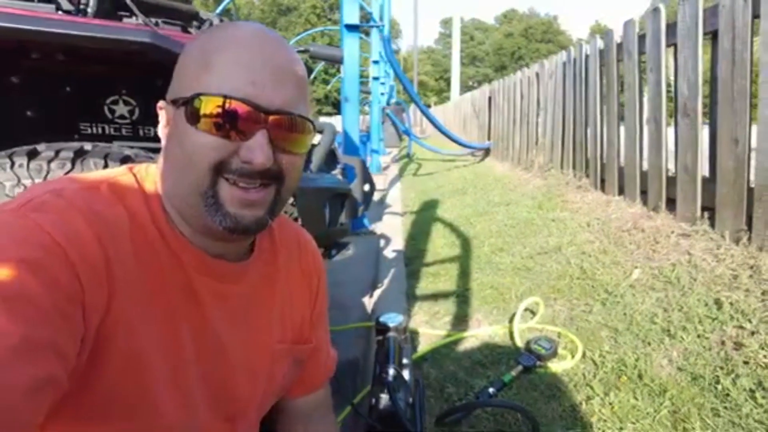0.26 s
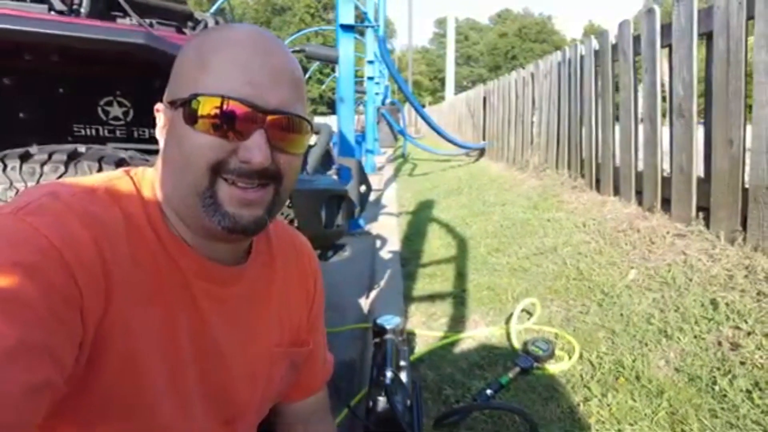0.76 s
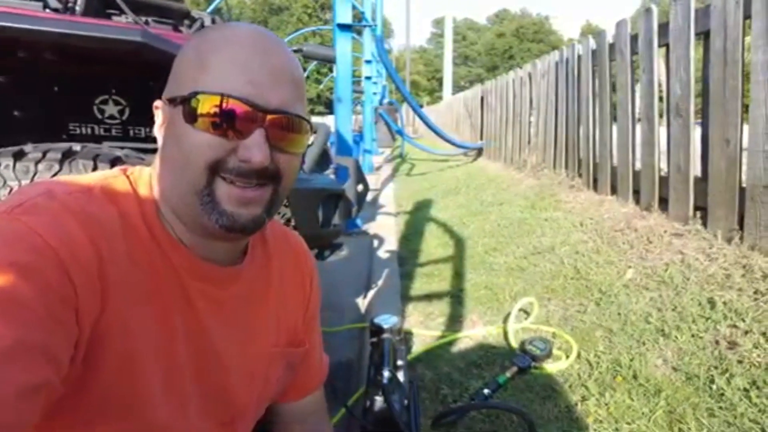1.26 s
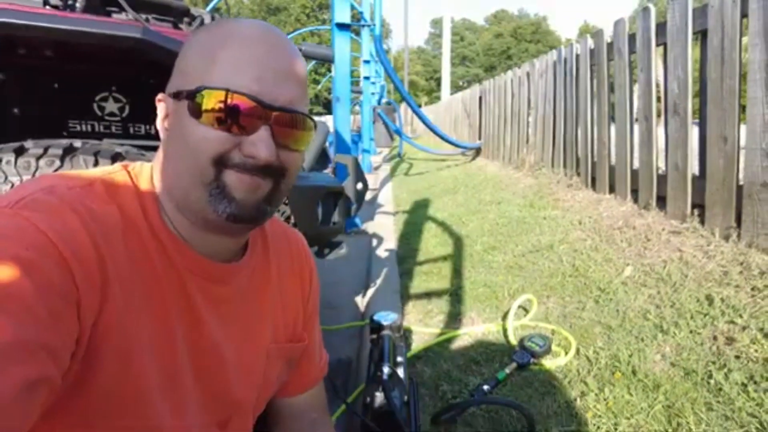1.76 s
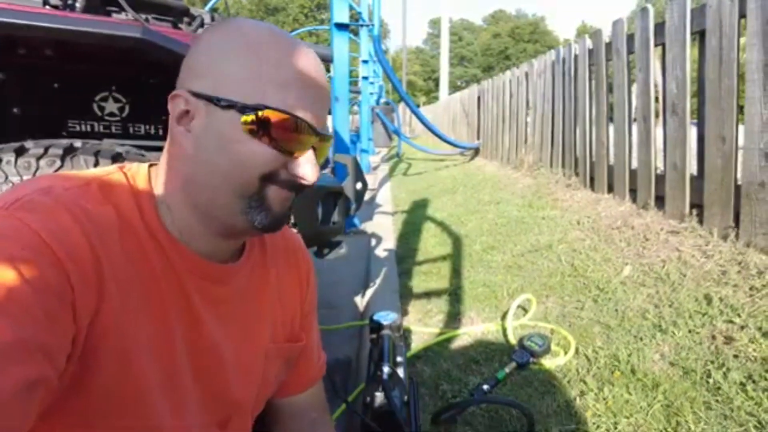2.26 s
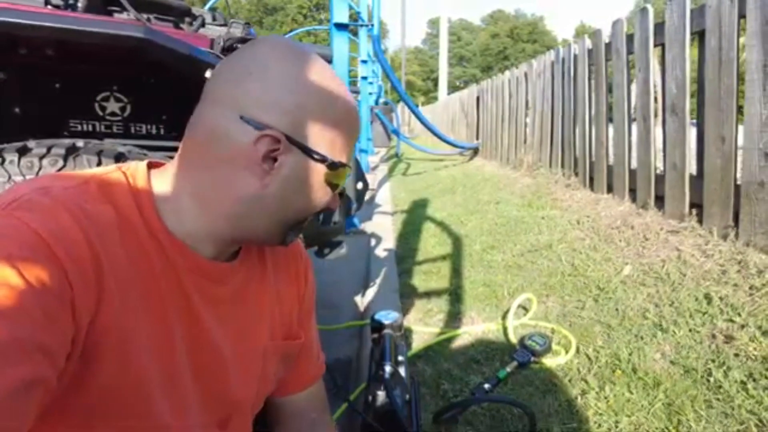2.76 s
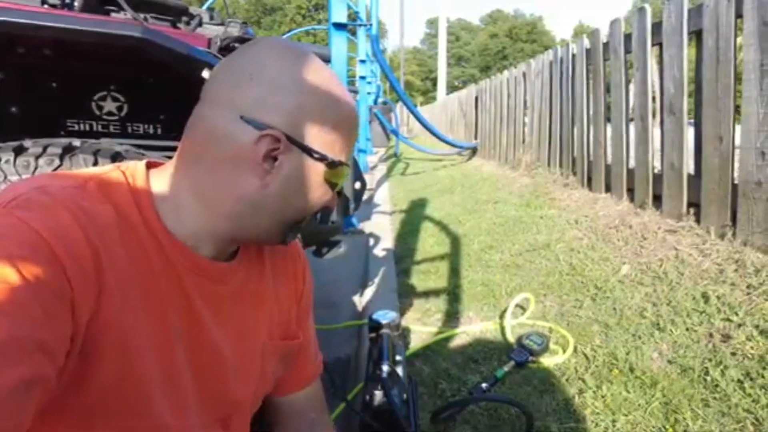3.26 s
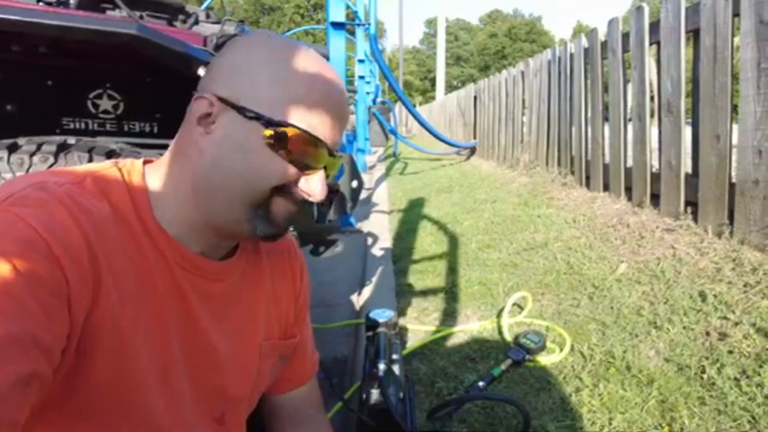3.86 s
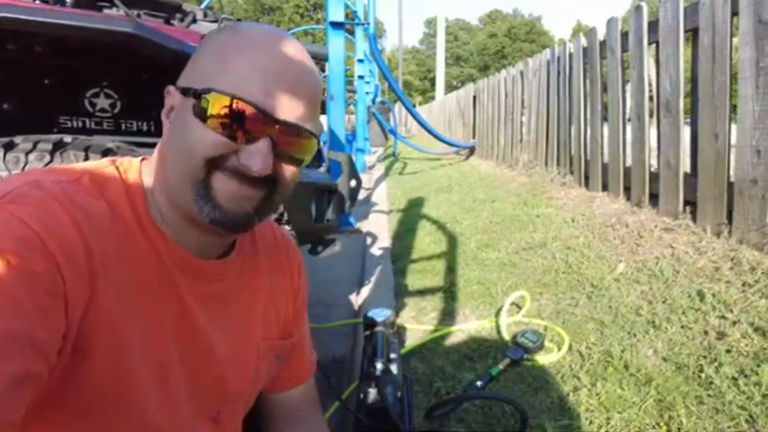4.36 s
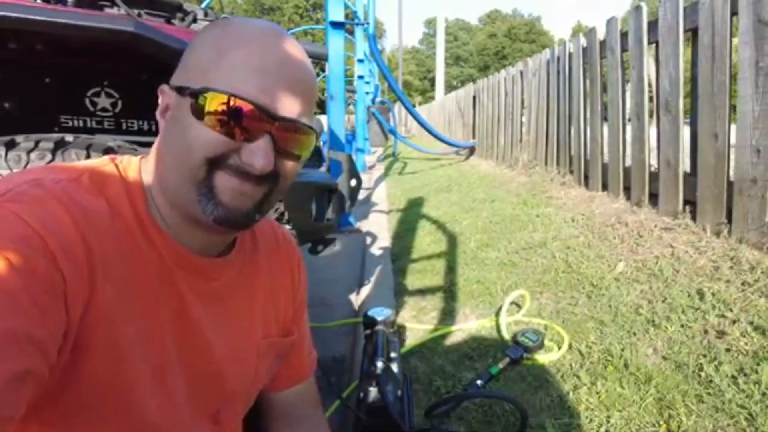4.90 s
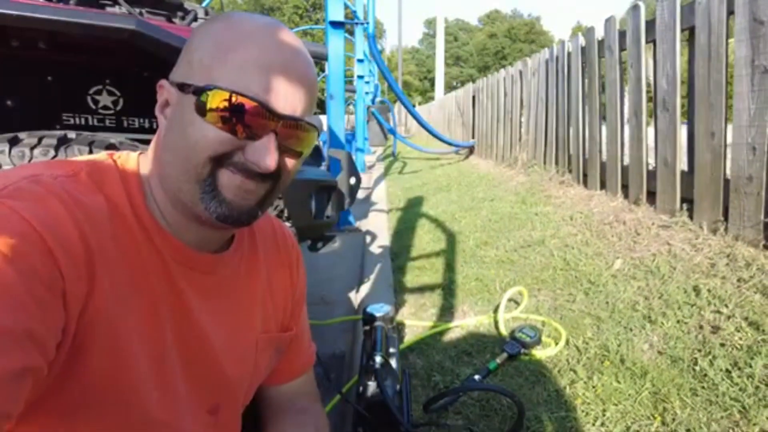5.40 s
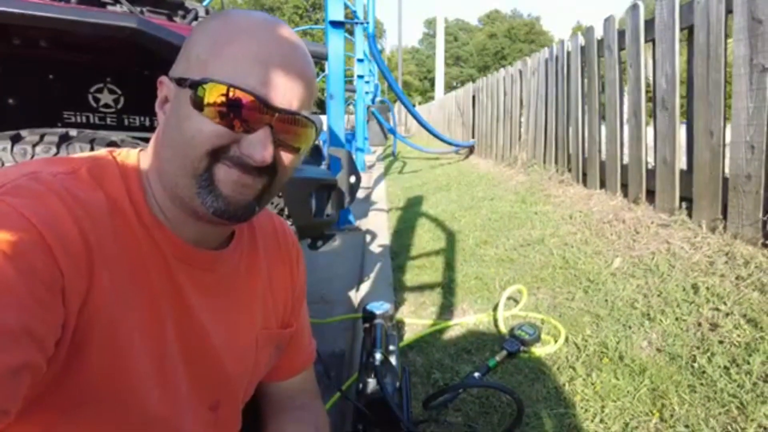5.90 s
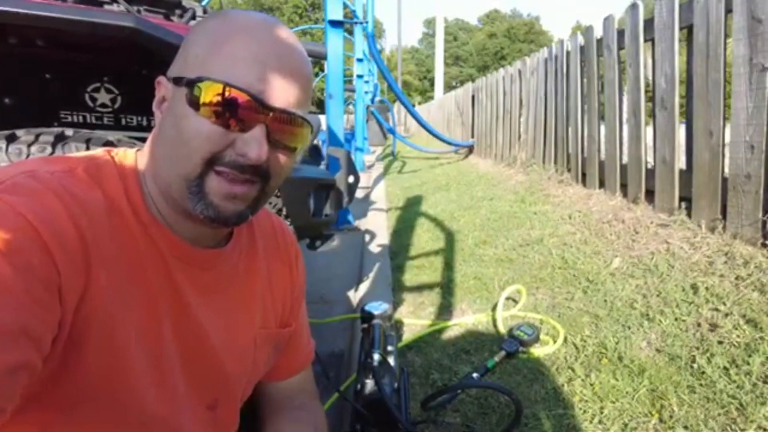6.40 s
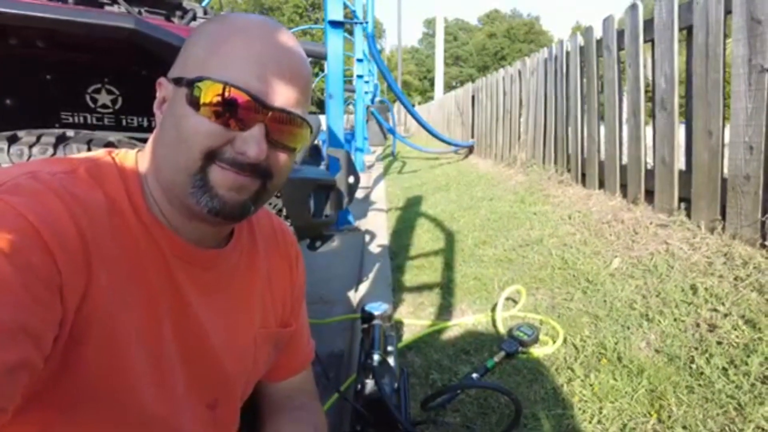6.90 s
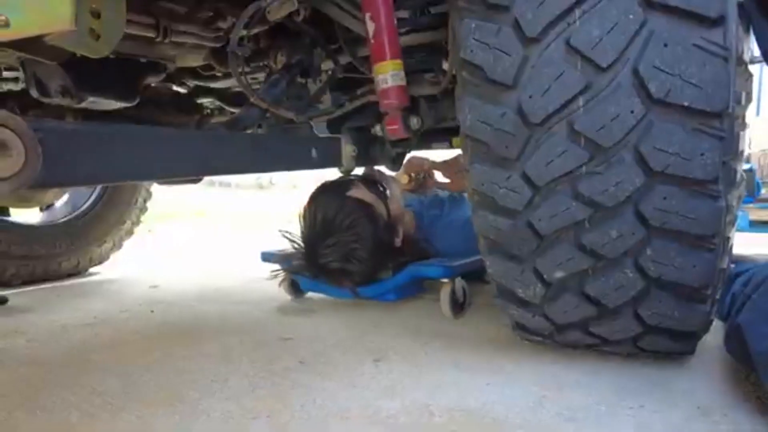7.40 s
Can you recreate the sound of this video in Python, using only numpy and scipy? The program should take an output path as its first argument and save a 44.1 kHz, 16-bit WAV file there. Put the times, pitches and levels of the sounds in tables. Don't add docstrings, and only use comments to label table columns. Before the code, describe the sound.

Outdoors on grass, a small piston compressor runs continuously, a loud coarse buzz with deep pulsing thud and a steady fan tone. A faraway car rolls by, then another pulls away with rising pitch, both mostly buried. A hard scene change ends the noise; quiet low rumble and faint hiss remain, with short dry steel clinks and a scrape close by. Wide handheld stereo pickup, dull and slightly gritty on top.

```python
import sys
import numpy as np
from scipy import signal
from scipy.fft import rfft, irfft, next_fast_len
from scipy.io import wavfile
from scipy.ndimage import uniform_filter1d

SR = 44100
rng = np.random.default_rng(int(sys.argv[2]) if len(sys.argv) > 2 else 0)


def level_to_linear(level):
    exponent = np.asarray(level, float) / 20
    return 10 ** exponent


def store_pcm(level_fs):
    pcm = np.round(np.clip(level_fs, -1, 1) * 32767).astype(np.int16)
    wavfile.write(sys.argv[1], SR, np.atleast_2d(pcm).T)


N = 337359
T = np.arange(N) / SR
PAD = next_fast_len(N + 4096)
F = np.maximum(np.fft.rfftfreq(PAD, 1 / SR), 1)
CUT_S = 7.087

# time_s, crank_hz
CRANK_SPEED = [(0, 49.37), (.9, 49.37), (1.15, 49.07), (2.3, 49.07), (2.7, 49.38), (7.1, 49.4)]
# pitch_hz, place_turns, length_turns, air_boost (ratio)
VALVE_EVENTS = [(600, .74, .1, .4), (1400, .54, .035, .6), (2800, .87, .04, .45), (5600, .86, .05, .8),
                (11000, .86, .05, .25)]


def curve(table, column=1):
    return np.interp(T, [row[0] for row in table], [row[column] for row in table])


def over_hz(table):
    return np.interp(np.log(F), np.log([max(row[0], 1) for row in table]), [row[1] for row in table])


def bumps(table, width_s):
    return sum(db * np.exp(-.5 * ((T - s) / width_s) ** 2) for s, db in table)


def walk(rate):
    k = int(SR / rate)
    held = np.repeat(rng.standard_normal(N // k + 1), k)
    return 1.28 * uniform_filter1d(uniform_filter1d(held, k), k)[:N]


def noise(gain):
    white = rng.standard_normal((2, PAD))
    return irfft(rfft(white) * gain * np.sqrt(SR / 2), PAD)[:, :N]


def unit(x):
    return x / np.sqrt(np.mean(x[0] ** 2))


def tone(turns, db, wobble_db, rate):
    mid_phase = 2 * np.pi * (turns + 0.027 * wobble_db * walk(rate))
    mid = np.sin(mid_phase) * level_to_linear(wobble_db * walk(rate))
    side = 0.4 * np.cos(2 * np.pi * (turns + 0.078 * wobble_db * walk(rate)))
    return np.sqrt(2) * level_to_linear(db) * np.array([mid, side])


def piston(turns):
    stroke_db = [-23, -56, -31, -35, -32.5, -42, -36, -69, -42, -38.5, -38, -47, -42, -40, -74, -41, -64,
                 -40.5, -53, -50, -42, -69, -71, -44, -41, -52.5, -49, -51.5, -79, -45, -47, -85, -52, -62,
                 -50.5, -72, -52, -59, -56, -61]
    # crank_multiple, level_db (rms)
    whine_lines = [(48, -73), (52, -60), (58, -57), (62, -55.5)]
    # time_s, level_db
    thud_swell = [(0, -18), (.7, -22.5), (1.15, -21.5), (1.6, -23), (2.3, -23.5), (2.7, -20.5), (3.15, -24),
                  (3.4, -23.5), (4.0, -21), (4.3, -18.5), (4.55, -20), (5.1, -24), (5.8, -22), (7.1, -22)]
    # time_s, depth_db
    thud_dips = [(.99, 10), (1.32, 2), (1.83, 9), (1.99, 6), (2.46, 11), (3.26, 8), (3.43, 9), (4.65, 15),
                 (5.5, 4), (5.88, -1), (6.5, 8)]
    orders = np.arange(1, len(stroke_db) + 1)
    places = np.interp(orders * CRANK_SPEED[0][1], [v[0] for v in VALVE_EVENTS], [v[1] for v in VALVE_EVENTS])
    lag = np.cumsum(places) + 0.14 * rng.standard_normal(len(orders))
    thud_db = curve(thud_swell) - bumps(thud_dips, width_s=0.02)
    out = tone(turns - .3, thud_db, wobble_db=1.6, rate=14)
    for k, delay, db in zip(orders[1:], lag[1:], stroke_db[1:]):
        out = out + tone(k * turns - delay, db, wobble_db=min(0.2 * k + 0.1, 4.2), rate=22)
    for k, db in whine_lines:
        out = out + tone(k * turns, db, wobble_db=1.5, rate=13)
    return out


def fan():
    fan_hz, shake_hz, shake_db = 39.07, 33.3, -35
    # shaft_multiple, level_db (rms)
    shaft_lines = [(2, -45), (7, -44), (9, -25), (11, -47), (13, -48), (14, -42), (16, -34.6), (18, -36),
                   (20, -48), (22, -53), (23, -43), (30, -52), (31, -51)]
    turns = np.cumsum(fan_hz * (1 + 0.0003613 * walk(1))) / SR
    blades = 0
    for k, db in shaft_lines:
        blades = blades + tone(k * turns + rng.random(), db, wobble_db=0.3 + 0.27 * max(k - 9, 0), rate=16)
    return blades + tone(shake_hz * T, shake_db, wobble_db=4.5, rate=3.38)


def air(turns, road_db):
    # pitch_hz, density_db (per Hz)
    air_colour = [(22, -48), (45, -43.5), (68, -41.5), (100, -39), (160, -48.5), (200, -46.5), (240, -54.5),
                  (400, -60), (470, -60.5), (545, -55.5), (600, -62), (710, -55.5), (760, -61.5), (900, -59),
                  (1100, -59.5),
                  (1250, -57.5), (1450, -62.5), (2000, -69.5), (3000, -72.5), (3600, -79.5), (5500, -79.5),
                (6100, -76.5), (7000, -81), (9000, -84), (11500, -86.5), (13500, -83.5), (15500, -83)]
    colour = level_to_linear(over_hz(air_colour) + 0.99)
    flap = 1.4 * walk(45)
    centres = np.log2([100] + [v[0] for v in VALVE_EVENTS])

    def band(k):
        share = np.interp(np.log2(F), centres, np.arange(len(centres)) == k)
        return noise(colour * np.sqrt(share))

    out = band(0) * level_to_linear(road_db - 6.0)
    for k, (hz, place, length, boost) in enumerate(VALVE_EVENTS, start=1):
        puffed = band(k)
        chatter_db = 2.0 * (hz / 11000) ** 1.5
        chatter = chatter_db * (walk(80) + .8 * flap) / np.sqrt(2)
        puff = np.exp((np.cos(2 * np.pi * (turns - place)) - 1) / (2 * np.pi * length) ** 2)
        strength = (1 + boost * puff * level_to_linear(1.9 * walk(50))) * level_to_linear(.5 * walk(9) + chatter)
        out = out + puffed * strength / np.sqrt(np.mean(strength ** 2))
    return out


def tools():
    # time_s, level_db, pitch_hz, t60_s, bright_db
    ring_hits = [
        (7.151, -39, 1430, 0.039, -13),
        (7.152, -54.5, 3100, 0.13, -9),
        (7.162, -46, 1460, .063, -15),
        (7.155, -47, 780, 0.09, -31),
        (7.225, -44, 675, 0.097, -23),
        (7.43, -61, 1300, .15, -25),
        (7.51, -39, 405, 0.16, -34),
    ]
    # time_s, level_db, pitch_hz, t60_s, bright_db
    knock_hits = [
        (7.214, -42, 1380, .065, -15),
        (7.36, -48, 1400, 0.13, -28),
        (7.512, -44, 1880, .15, -38),
        (7.528, -51, 2200, 0.14, -42),
        (7.63, -53, 1400, 0.34, -27),
    ]
    # time_s, level_db, pitch_hz, t60_s, bright_db
    scrape_hits = [
        (7.193, -47, 1000, 0.28, -26),
        (7.212, -51, 3500, 0.015, 1),
        (7.295, -49, 1300, 0.14, -19),
        (7.24, -63, 2600, .5, -22),
        (7.358, -50, 1700, .04, -28),
        (7.49, -55, 1260, .1, -30),
        (7.509, -41, 1000, 0.16, -40),
    ]
    rise_share = 0.014
    spray = unit(noise(1 / np.hypot(1, (F ** 2 - 6800 ** 2) / (F * 1900)) ** 0.73))
    out = 0
    for hits, width in ((ring_hits, 0.32), (knock_hits, 0.63), (scrape_hits, 0.87)):
        for s, db, hz, t60, bright_db in hits:
            age = np.maximum(T - s, 0)
            shape = level_to_linear(db - 60 * age / t60) * np.minimum(age / (rise_share * t60), 1)
            ring = shape * noise(1 / (1 + ((F ** 2 - hz ** 2) / (F * width * hz)) ** 4))
            ring = unit(ring) * np.sqrt(np.mean(shape ** 2))
            out = out + ring + level_to_linear(bright_db) * shape * spray
    return out


def taps():
    # start_s, level_db, pitch_hz, t60_s
    steel_taps = [(7.151, -36, 1470, .04), (7.163, -43, 1450, .04), (7.203, -44, 790, .04),
                  (7.2135, -48, 6460, .015), (7.2135, -45, 2900, .008), (7.2135, -46, 2100, .01),
                  (7.221, -53, 4300, .015), (7.2135, -52, 4500, .006), (7.151, -54, 3200, .012),
                  (7.151, -55, 2300, .01), (7.51, -43, 1900, .025), (7.51, -44, 520, .05),
                  (7.152, -54, 6700, .03), (7.152, -58, 10500, .01), (7.2135, -55, 11500, .01),
                  (7.218, -38, 1380, .04), (7.297, -51, 1290, .025), (7.357, -53, 2500, .02),
                  (7.3615, -44, 1470, .09), (7.3615, -51, 2700, .012), (7.466, -37, 171, .06),
                  (7.51, -38, 1030, .035), (7.517, -36, 1840, 0.045), (7.525, -47, 2400, .04),
                  (7.529, -43, 1350, .04), (7.536, -43, 2190, .04), (7.544, -45, 1150, .04),
                  (7.553, -51, 1600, .06), (7.562, -54, 1950, .06), (7.433, -54, 1350, .05),
                  (7.513, -42, 1500, .03), (7.533, -45, 1750, .04), (7.63, -55, 1850, .1),
                  (7.641, -45, 1240, .04)]
    rise_s = .0003
    out = 0
    for s, db, hz, t60 in steel_taps:
        age = np.maximum(T - s, 0)
        envelope = level_to_linear(db - 60 * age / t60) * (1 - np.exp(-age / rise_s))
        out = out + envelope * np.sin(2 * np.pi * hz * age)
    return np.sqrt(2) * out * np.array([[1], [.3]])


def engine(hz, top_db, lower_db):
    # share_of_top_line, level_db
    lower_orders = [(6 / 13, -6), (8 / 13, 0), (11 / 13, -2)]
    turns = np.cumsum(hz) / SR
    lower = sum(tone(share * turns, top_db + lower_db + db, wobble_db=1.2, rate=5.5) for share, db in lower_orders)
    return tone(turns, top_db, wobble_db=1.0, rate=9) + lower


def traffic():
    # time_s, top_line_hz, level_db
    cruise = [(0, 106, -25), (.1, 103.5, -27), (.3, 97.6, -27.5), (.65, 97.6, -31), (1.04, 98, -25),
              (1.28, 98, -26), (1.4, 97, -42), (1.7, 97, -32), (2.93, 108.5, -28.5), (3.15, 107, -44),
              (3.45, 106.5, -32), (3.6, 106.3, -26), (3.85, 105.7, -27), (4.05, 104.5, -38),
              (4.6, 104, -40)]
    # time_s, swell_db
    road_gusts = [(.02, 3), (.4, 0.5), (.95, 2), (1.4, 0), (1.72, 2.5), (2.08, -3.5), (2.65, -0.5),
                  (3.22, -2.5), (4.2, 5.5), (3.85, 0.5), (4.82, 6.5), (5.25, 5), (6.2, 2), (5.68, 10),
                  (7.08, -3)]
    pull_s, from_hz, to_hz, settle_s = 4.68, 108, 133, .78
    pull_level_db, rise_s, pull_lower_db = -30.5, 0.14, 3
    age = np.maximum(T - pull_s, 0)
    pull_hz = to_hz - (to_hz - from_hz) * np.exp(-age / settle_s)
    surge = bumps([(5.3, 5.5)], width_s=0.15)
    pull_db = pull_level_db + surge - 30 * (1 - np.minimum(age / rise_s, 1)) ** 2
    cruise_db = curve(cruise, column=2) - 25 * age
    both_db = 10 * np.log10(level_to_linear(pull_db + pull_lower_db) ** 2 + level_to_linear(cruise_db) ** 2)
    road_db = -1.5 + 0.054 * (both_db - pull_level_db) + bumps(road_gusts, width_s=0.15) + walk(15)
    cars = [(curve(cruise), cruise_db, -6.5), (pull_hz, pull_db, pull_lower_db - 1.0 * surge)]
    return cars, road_db


def driveway():
    # pitch_hz, density_db (per Hz)
    drive_colour = [(12, -38), (20, -3), (66, 6), (169, -2), (242, -9.5), (433, -27), (497, -20),
                    (674, -38), (733, -27), (1170, -41), (1270, -33), (2600, -45), (3760, -52),
                    (15000, -61.5)]
    # pitch_hz, level_db (rms)
    hum_lines = [(246, -51), (494, -55), (740, -70)]
    # time_s, rise_db
    idle_lopes = [
        (7.15, 14),
        (7.21, 8),
        (7.255, 8),
        (7.335, 12),
        (7.4, 12.5),
        (7.54, 7),
        (7.61, 8),
    ]
    open_s, idle_hz, idle_db = 7.13, 52.7, -51
    colour = level_to_linear(over_hz(drive_colour))
    opening = np.clip((T - open_s) / .02, .2, 1)
    low = 1 / (1 + (F / 330) ** 6)
    rumble_db = -43.5 - 4 * (T - open_s).clip(0) + 3 * walk(22)
    rumble = unit(noise(colour * np.sqrt(low / (1 + (75 / F) ** 6)))) * opening * level_to_linear(rumble_db)
    surge = bumps(idle_lopes, width_s=.027)
    turns = np.cumsum(idle_hz - 8 + 0.72 * surge) / SR
    idle = 0
    for k in (1, 2, 3):
        idle = idle + tone(k * (turns - .25) + 0.27, idle_db + surge - 7 * (k - 1), wobble_db=3.0, rate=20)
    hiss = noise(colour * np.sqrt(1 - low)) * level_to_linear(-55.5 + 2.5 * walk(30))
    hiss = hiss * np.clip((T - open_s) / .012, .12, 1)
    hum = sum(tone(hz * T, db, wobble_db=0.0, rate=8.6) for hz, db in hum_lines)
    return rumble + opening * idle + hiss + hum


def ports(pair):
    # pitch_hz, lead_rad
    left_lead = [(60, -0.18), (250, 0.43), (330, 0.42), (520, 0.5), (780, 0.68), (1120, 1), (1550, -0.56),
                 (2400, 0.18), (6000, 0.21)]
    # pitch_hz, level_db
    side_level = [(40, -5.5), (90, -25), (180, -8.5), (350, -12.5), (520, -6), (700, 0.5), (1000, -2),
                  (1400, -8), (2800, 0.5), (5600, 1.5), (8700, 3.5), (9300, -7), (13000, -16)]
    # pitch_hz, level_db
    port_balance = [(40, 2), (100, -0.5), (250, 0), (1400, 0.5), (5000, -0.5), (9000, 0)]
    mid, side = rfft(np.pad(pair, ((0, 0), (0, PAD - N)), mode="reflect"))
    turn = np.exp(.5j * over_hz(left_lead))
    side = side * level_to_linear(over_hz(side_level) - 2.0)
    lean = level_to_linear(over_hz(port_balance) / 2)
    left, right = lean * (mid * turn + side), (mid / turn - side) / lean
    return irfft(np.array([left, right]), PAD)[:, :N]


def scene():
    turns = np.cumsum(curve(CRANK_SPEED)) / SR
    cars, road_db = traffic()
    yard = piston(turns) + fan() + air(turns, road_db) + sum(engine(*car) for car in cars)
    yard = ports(yard)
    thin = irfft(rfft(yard, PAD) / np.hypot(1, 2000 / F), PAD)[:, :N]
    spill_end_s = 7.11
    fade_s = [CUT_S - .001, CUT_S + .001]
    gate = np.interp(T, fade_s, [1, 0])
    spill = np.interp(T, fade_s + [spill_end_s - .004, spill_end_s], [0, level_to_linear(-13), level_to_linear(-14), 0])
    quiet = ports(driveway() + tools() + taps())
    return yard * gate + thin * spill + quiet * (T > CUT_S)


def starve(x):
    # pitch_hz, dead_zone (ratio)
    dead_zone = [(3500, 0.22), (5600, 0.62), (5800, 0.37), (6500, 1.6), (7000, 2.2), (8700, 1.78),
                 (9200, 1.01), (11500, 1.08), (12500, 1.1), (15000, 0.99)]
    # time_s, drift_db
    hunger_drift = [(0, .5), (1.1, .5), (1.2, 2), (1.6, 1.5), (1.75, -.5), (2.1, 2), (2.4, 0), (4.5, 1),
                    (5, 0), (7.1, 0)]
    # start_s, length_s
    band_blanks = [
        (0, .07),
        (.2, .07),
        (.45, .18),
        (.82, .14),
        (1.12, .06),
        (1.24, .07),
        (1.85, .08),
        (2.22, .06),
    ]
    band_edges = [4650, 5170, 5685, 6290] + [6890 + 689 * k for k in range(13)]
    frame_start, top_hz = 844, 14990
    steady_hz = 8980
    hold, shared, spread_db = 0.25, 0.15, 9.0
    start = 1024 - frame_start
    padded = np.pad(x, ((0, 0), (start, 2048)), mode="reflect")
    hz, frames, z = signal.stft(padded, SR, window="cosine", nperseg=2048)
    band = np.searchsorted(band_edges, hz)
    luck = rng.standard_normal((80, len(frames)))
    luck = signal.lfilter([np.sqrt(1 - hold ** 2)], [1, -hold], luck + shared * luck[0])
    size = np.abs(z.mean(0))
    rms = np.sqrt(uniform_filter1d(size ** 2, size=40, axis=0))
    calm = np.where((hz > steady_hz) | (hz < band_edges[2]), .55, 1)[:, None]
    drift_db = np.interp(frames, *np.transpose(hunger_drift)) * (hz > band_edges[2])[:, None]
    shift_db = spread_db * luck[band] * calm + drift_db - 14 * (frames > CUT_S)
    dead = np.interp(hz, *np.transpose(dead_zone), left=0)[:, None] * level_to_linear(shift_db)
    gaps = sum((frames > s) & (frames < s + length) for s, length in band_blanks).astype(bool)
    blank = (band == 3)[:, None] & gaps
    keep = (size >= dead * rms) & (hz < top_hz)[:, None] & ~blank
    wide = signal.lfilter([.8], [1, -.6], rng.standard_normal(luck.shape))[band] > .55
    side = (z[0] - z[1]) / 2 * np.where((hz > steady_hz)[:, None], wide * level_to_linear(9.5), 1)
    z = z.mean(0) + side * np.array([1, -1])[:, None, None]
    return signal.istft(z * keep, SR, window="cosine", nperseg=2048)[1][:, start:][:, :N]


def top_cut(x):
    return signal.sosfilt(signal.butter(12, 15740, fs=SR, output="sos"), x)


def record(dry):
    rounded = dry / (1 + np.abs(dry / .72) ** 6) ** (1 / 6)
    mix = starve(rounded)
    return top_cut(mix)


dry = scene()
out = record(dry)
store_pcm(out)
```